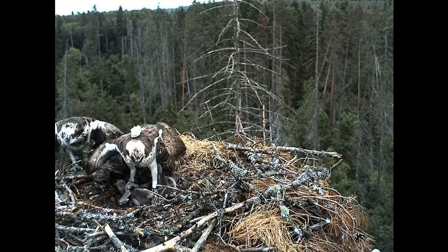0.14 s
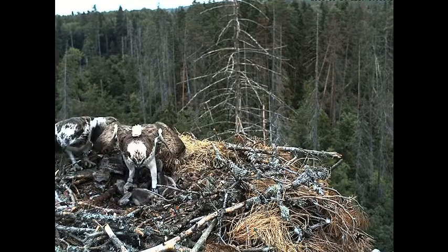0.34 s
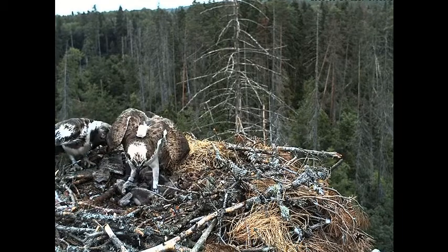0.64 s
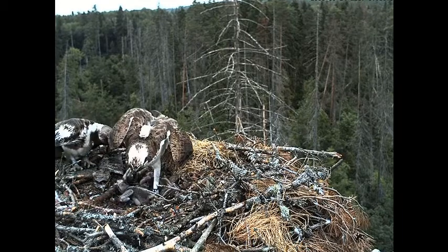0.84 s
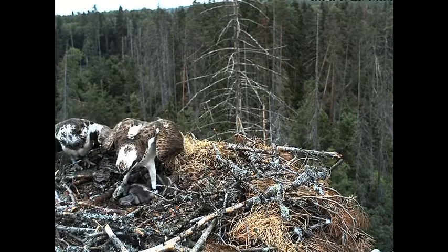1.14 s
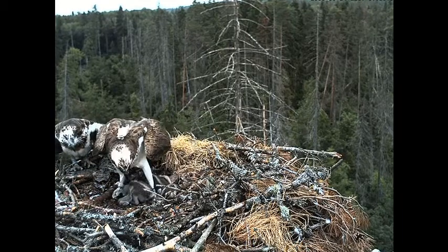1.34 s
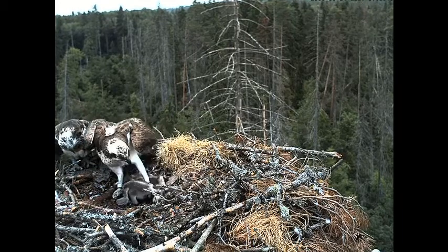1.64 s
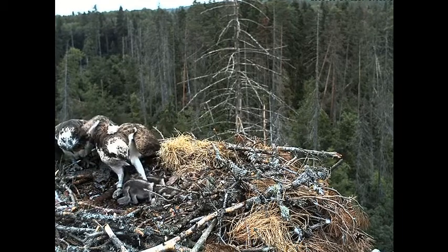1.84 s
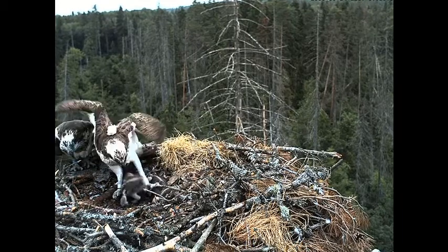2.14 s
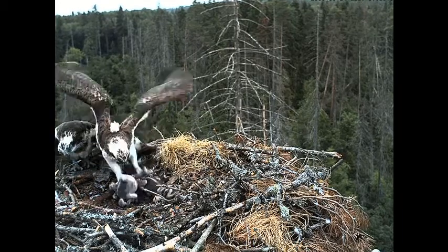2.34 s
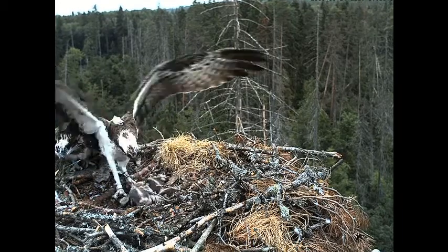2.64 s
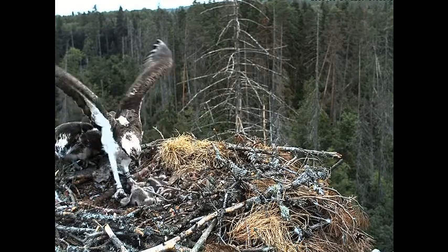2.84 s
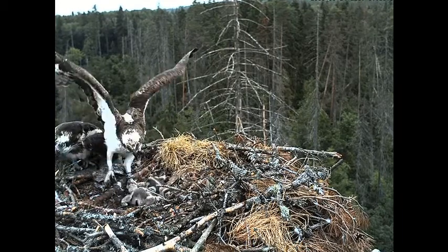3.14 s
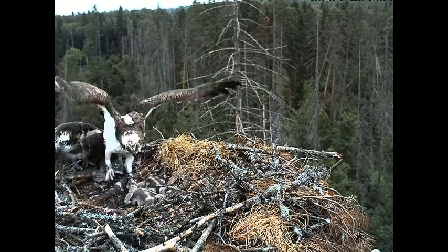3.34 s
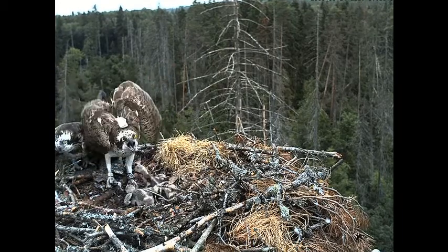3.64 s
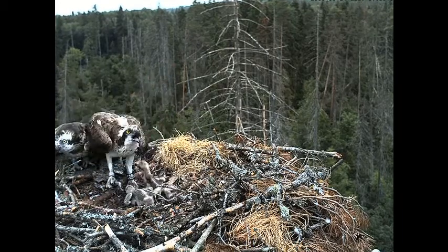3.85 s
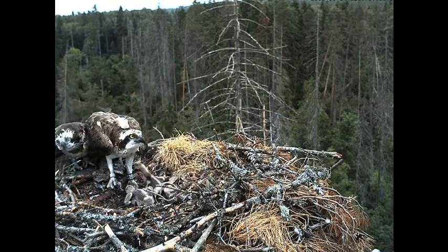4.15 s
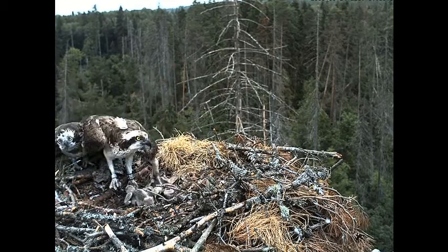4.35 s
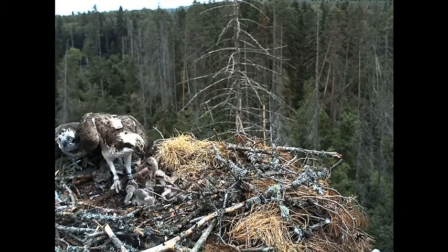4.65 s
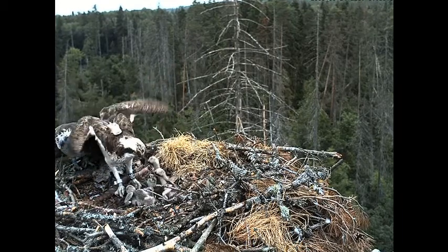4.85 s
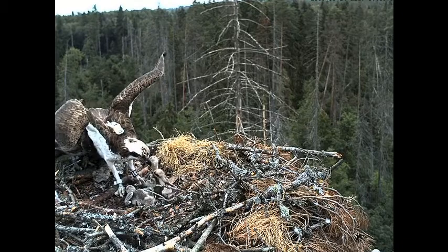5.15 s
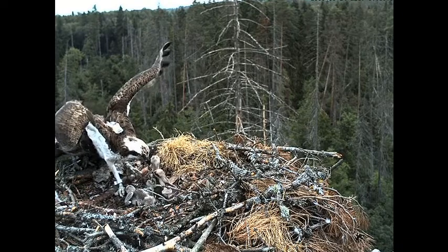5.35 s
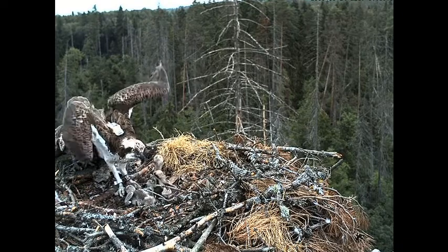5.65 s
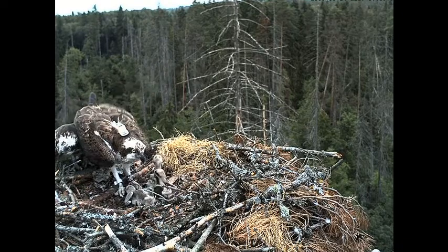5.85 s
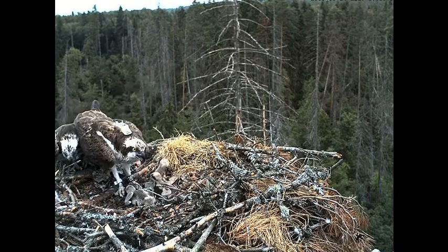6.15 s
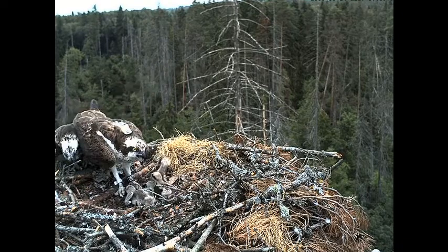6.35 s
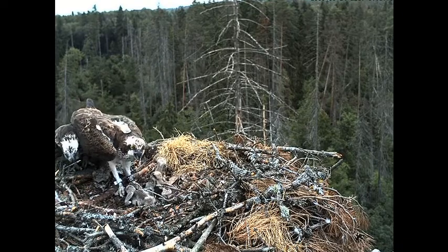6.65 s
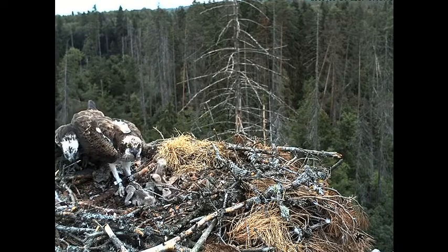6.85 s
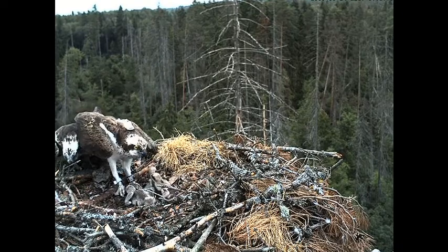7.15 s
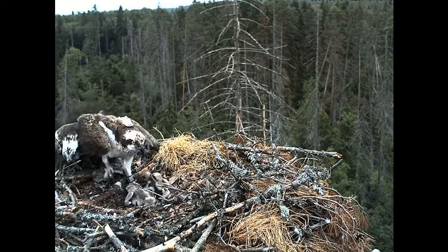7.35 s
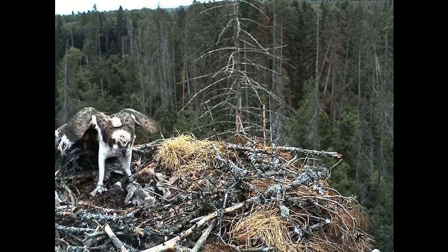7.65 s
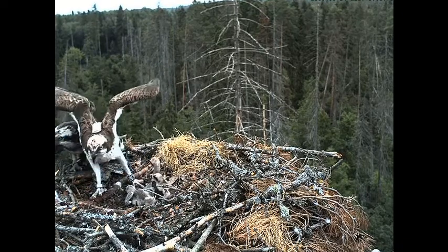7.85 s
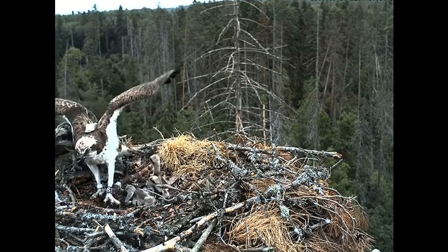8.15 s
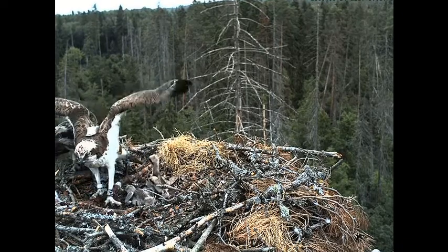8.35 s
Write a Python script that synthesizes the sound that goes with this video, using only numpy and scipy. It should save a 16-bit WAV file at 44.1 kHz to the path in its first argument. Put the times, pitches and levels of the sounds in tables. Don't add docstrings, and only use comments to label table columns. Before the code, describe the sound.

An outdoor osprey nest in a forest, heard close with a band-limited, slightly gritty sound. At once a loud, tiny whistle drops steeply. Until about 2.4 s chicks beg in dense, uneven clusters of thin, very quick gliding peeps, busiest between 1 and 2.4 s. At 2.5 s an adult gives a sharp falling whistle that turns hoarse. Peeps become scattered. A harsher downward slur comes at 3.9 s, a longer, nearly level cry with a falling end at 5.3 s, and a harsh dip that rises again at 6.6 s. Weaker short chirps follow at 7.7, 8.1 and 8.4 s, the last two double-pulsed. Dry twig ticks and brief feathery rasps occur throughout. Soft wind rushes and hisses underneath, strongest near 2 s, swelling again around 5.5 s, quietest near 6 s. Loud calls leave faint tree echoes.

```python
import sys
import numpy as np
from scipy import signal
from scipy.fft import rfft, irfft
from scipy.io import wavfile
from scipy.ndimage import uniform_filter1d, map_coordinates

SR = 44100
rng = np.random.default_rng(int(sys.argv[2]) if len(sys.argv) > 2 else 0)


def digitize_waveform(pressure):
    field = np.atleast_2d(pressure).T
    bounded = np.clip(field, -1, 1)
    quanta = np.round(bounded * 32767).astype(np.int16)
    wavfile.write(sys.argv[1], SR, quanta)


def voltage_ratio(decibels):
    exponent = np.asarray(decibels, float) / 20
    return 10 ** exponent


N = 374850


def unit(x):
    return x / np.sqrt(np.mean(x ** 2) + 1e-20)


def along(points, hz):
    f, db = np.transpose(points)
    return voltage_ratio(np.interp(np.log(hz + 1), np.log(f + 1), db))


def filtered(x, response, rate=SR):
    return irfft(rfft(x) * response(np.fft.rfftfreq(len(x), 1 / rate)), len(x))


def wobble(rate):
    knots = rng.standard_normal(int(N * rate / SR) + 4)
    return map_coordinates(knots, [np.arange(N) * rate / SR])


def smooth(x, seconds):
    return uniform_filter1d(x, max(1, int(seconds * SR)))


def resonance(hz, width):
    return lambda f: 1j * f * width / (hz * hz - f * f + 1j * f * width)


# t/s, low rush level/dB, needle hiss level/dB
WIND_LEVELS = [
    (0.0, -68, -64.5),
    (1.68, -66.5, -61),
    (2.01, -64, -56.5),
    (3.69, -69, -64),
    (4.12, -71, -60),
    (4.36, -69.5, -64),
    (5.28, -67, -62.5),
    (5.49, -65.5, -62),
    (6.08, -72, -68),
    (8.5, -70.5, -65.5),
]
# f/Hz, level/dB per Hz
RUSH_SPECTRUM = [(59, -66), (100, -34), (329, -7), (440, -2.5), (912, -10.5), (994, -13), (1300, -13.5),
                 (1690, -42), (2860, -120)]
# f/Hz, level/dB per Hz
NEEDLE_SPECTRUM = [(530, -42), (900, -16.5), (1240, -10), (1690, -6.5), (1900, -8), (2670, -3), (4000, -14),
                   (5200, -45), (8800, -120)]


def wind():
    s, *levels = np.transpose(WIND_LEVELS)
    t = np.arange(N) / SR
    gust, out = wobble(10), 0
    for db, spectrum, own_db in zip(levels, (RUSH_SPECTRUM, NEEDLE_SPECTRUM), (2.2, 1.5)):
        z = signal.stft(rng.standard_normal(N), nperseg=256)[2]
        patches = uniform_filter1d(rng.standard_normal(z.shape), 4, 0)
        patches = uniform_filter1d(patches, 10, 1)
        noise = signal.istft(z * voltage_ratio(0.81 * unit(patches)), nperseg=256)[1][:N]
        coloured = unit(filtered(noise, lambda f: along(spectrum, f)))
        gain = voltage_ratio(np.interp(t, s, db) + 0.64 * gust + own_db * wobble(25))
        out = out + gain * coloured
    return out


# t/s, peak level/dB, ring f/Hz
TWIG_TICKS = [(0.383, -40, 3150), (0.769, -34, 2210), (0.802, -38, 3030), (0.9, -39, 2730),
              (1.995, -31.5, 1960), (2.599, -27, 2090), (3.118, -41.5, 1970), (3.173, -39, 2084),
              (3.394, -40, 3000), (3.417, -36.5, 1710), (3.686, -38, 3120), (4.154, -39.5, 2398),
              (4.319, -29.5, 2126), (4.644, -28, 1807), (4.754, -29, 2120), (5.627, -38.5, 2770),
              (5.669, -40, 3143), (5.719, -47.5, 3090), (5.802, -40, 3170), (6.96, -41.5, 3067),
              (7.204, -28.5, 2480), (7.345, -46, 2130), (7.601, -37, 2050), (7.896, -37, 2190),
              (8.2, -40, 3040)]


def twigs():
    out, t = np.zeros(N), np.arange(SR // 20) / SR
    for s, db, hz in TWIG_TICKS:
        crack = voltage_ratio(-60 * t / 0.012) * rng.standard_normal(len(t))
        ring = 1.6 * voltage_ratio(-60 * t / 0.013) * np.sin(2 * np.pi * hz * t)
        out[round(s * SR):][:len(t)] += voltage_ratio(db - 5.0) * (crack + ring)
    body = signal.butter(2, [700, 4200], "band", fs=SR, output="sos")
    return signal.sosfilt(body, out)


# t/s, length/s, centre f/Hz, width/Hz, level/dB
RASP_BURSTS = [(0.016, .016, 2500, 2000, -43.5), (.17, .055, 3100, 910, -54), (1.6, .04, 1800, 1220, -57),
               (1.77, .055, 3300, 1298, -50), (1.835, .06, 1700, 1213, -46.5),
               (2.08, 0.065, 2500, 2010, -50.5), (2.3, 0.038, 3600, 880, -53),
               (3.857, .03, 2500, 2500, -50.5), (6.585, .035, 2500, 2500, -48),
               (4.7, 0.091, 1800, 1340, -54.5), (4.82, 0.044, 2300, 1479, -58),
               (7.21, 0.024, 1800, 1500, -59), (7.28, .05, 1900, 1200, -61),
               (7.35, 0.058, 2100, 700, -61.5), (7.61, .08, 1600, 1018, -68.5)]


def rasps():
    out = np.zeros(N)
    for s, length, hz, width, db in RASP_BURSTS:
        n = round(length * SR)
        grain_db = 4.5 * unit(smooth(rng.standard_normal(8192), 0.002))
        grain = rng.standard_normal(8192) * voltage_ratio(grain_db)
        band = resonance(hz, width)
        noise = unit(filtered(grain, lambda f: band(f) ** 2))[:n]
        out[round(s * SR):][:n] += voltage_ratio(db) * noise * signal.windows.tukey(n, 0.4)
    return out


# t/s, length/s, start f/Hz, middle f/Hz, end f/Hz, level/dB
BEGGING_GLIDES = [(0.026, 0.006, 2550.0, 2570.0, 2230.0, -44.5), (0.083, 0.008, 2200.0, 2165, 1950, -45),
                  (0.175, 0.015, 2960, 3110, 3130, -55.5), (0.201, 0.01, 3360, 3100, 3680, -48.5),
                  (0.276, 0.01, 3380, 2960, 2700.0, -39.5), (0.285, 0.007, 2090.0, 1700.0, 1660, -45.5),
                  (0.435, 0.013, 2010, 2670, 3220, -43), (0.446, 0.014, 3210, 3007, 2980, -43.5),
                  (0.491, 0.012, 3070, 3420, 3600, -36), (0.498, 0.013, 3670, 3130, 3030, -27.5),
                  (0.546, 0.011, 2624, 2150, 2090, -44), (0.684, 0.006, 2090, 2270.0, 2510, -47.5),
                  (0.692, 0.014, 3000, 3230.0, 3410.0, -46.5), (0.731, 0.006, 3790, 3580.0, 3270.0, -50.5),
                  (0.777, 0.005, 1840, 2110, 2250, -49), (0.807, 0.005, 1690.0, 1710, 1730, -48),
                  (0.941, 0.013, 1940, 2355, 2484, -42), (0.957, 0.013, 2420.0, 2465, 2516, -48.5),
                  (0.965, 0.013, 2600.0, 2855, 3520, -45.5), (0.974, 0.014, 3420, 3420, 2940, -45.5),
                  (0.993, 0.016, 3130, 3060, 2900, -34.5), (1.047, 0.022, 3680, 2660, 1640, -38.0),
                  (1.209, 0.011, 3430, 2890.0, 2210, -33), (1.221, 0.027, 3270, 3010.0, 1670, -44.0),
                  (1.249, 0.005, 3620, 3590.0, 3650, -50), (1.255, 0.008, 3250.0, 3460.0, 3470, -42),
                  (1.268, 0.008, 4090.0, 3570.0, 3090, -39.0), (1.343, 0.009, 3060.0, 2870.0, 2520, -36),
                  (1.351, 0.006, 2120, 1836, 1464, -37.5), (1.366, 0.013, 2690, 2910, 3170, -48),
                  (1.38, 0.013, 3150, 3320, 3400, -59), (1.394, 0.017, 3490, 3090, 2290.0, -41),
                  (1.618, 0.01, 2116, 1980, 1994, -60), (1.636, 0.014, 3380.0, 2840, 2100.0, -29.5),
                  (1.647, 0.014, 2190, 1780.0, 1326, -37.5), (1.77, 0.005, 3150.0, 3517, 3700, -43),
                  (1.791, 0.017, 2980.0, 3290.0, 3050.0, -44), (1.812, 0.009, 3340.0, 3270.0, 3380, -39.5),
                  (1.818, 0.005, 3937, 3920.0, 3700.0, -47.5),
                  (1.831, 0.006, 3940.0, 3910.0, 3640.0, -29.5),
                  (1.837, 0.012, 3210.0, 3240.0, 3232, -38.5), (1.853, 0.005, 3507, 3270.0, 3346, -44),
                  (1.861, 0.015, 3240, 3477, 3367, -37.5), (1.877, 0.015, 3260, 3310, 3190, -32.5),
                  (1.892, 0.006, 2860.0, 2760.0, 2760, -29), (1.899, 0.011, 2206, 1598, 1410.0, -31),
                  (1.996, 0.016, 1790, 2260.0, 2945, -41.5), (2.014, 0.005, 3218, 3520.0, 3879, -39),
                  (2.017, 0.014, 2865, 3333, 3140.0, -47), (2.07, 0.006, 3423, 3350, 3170, -35),
                  (2.077, 0.011, 3025, 3190, 2920.0, -54), (2.123, 0.016, 3730, 3096, 2643, -34.5),
                  (2.138, 0.011, 2130.0, 1593, 1372, -31), (2.15, 0.05, 2395, 2583, 3000, -58),
                  (2.252, 0.008, 1920.0, 1840.0, 2104, -47), (2.258, 0.005, 1772, 1960.0, 2076, -45.5),
                  (2.262, 0.008, 3210.0, 3600.0, 4070, -48.5), (2.32, 0.007, 3540, 3407, 3714, -56.5),
                  (2.332, 0.014, 3870, 3760.0, 3853, -51.5), (2.344, 0.015, 4036, 3750.0, 2942, -28),
                  (2.377, 0.015, 3177, 2603, 1950.0, -32), (2.405, 0.009, 3620.0, 3080, 2770, -34.5),
                  (2.413, 0.016, 2433, 1807, 1117, -34)]
# t/s, length/s, start f/Hz, middle f/Hz, end f/Hz, level/dB
LATER_PEEPS = [(2.617, 0.01, 1643, 1834, 2087, -52), (2.69, 0.021, 2366, 2815, 2830, -42),
               (2.709, 0.022, 2873, 2840.0, 2611, -42), (2.731, 0.009, 2160.0, 1971, 1641, -41.5),
               (2.745, 0.005, 2365, 2274, 2334, -39), (2.771, 0.015, 3430.0, 3109, 2715, -35),
               (2.795, 0.009, 2142, 1885, 1598, -51), (3.116, 0.007, 2272, 2078, 2031, -43),
               (3.139, 0.01, 2281, 1905, 1376, -46.5), (3.15, 0.005, 2152, 2029, 1979, -60),
               (3.178, 0.05, 2474, 2500, 2541, -58.5), (3.413, 0.012, 1574, 1704, 1606, -54),
               (3.622, 0.012, 1240.0, 1618, 2176, -50.5), (3.662, 0.014, 3450.0, 3350, 3113, -34.5),
               (3.678, 0.014, 3112, 3113, 3138, -33.5), (3.744, 0.011, 2920.0, 2523, 2426, -48),
               (3.754, 0.007, 1991, 1842, 2234, -45.5), (4.178, 0.021, 2172, 2757, 2924, -35),
               (4.199, 0.009, 2918, 2714, 2838, -40.5), (4.208, 0.012, 2841, 2897, 3176, -42.5),
               (4.223, 0.014, 2880, 3037, 3053, -45), (4.231, 0.015, 3043, 3170, 3508, -50),
               (4.251, 0.013, 2767, 3080, 3100, -45.5), (4.261, 0.013, 3186, 2823, 2653, -31),
               (4.306, 0.012, 2660.0, 2394, 2058, -35), (4.318, 0.012, 2712, 2089, 2162, -44),
               (4.597, 0.008, 3091, 2536, 2440.0, -36.5), (4.632, 0.01, 2742, 2164, 1872, -40.5),
               (4.739, 0.006, 1673, 1687, 1650.0, -43), (4.751, 0.007, 2093, 2156, 2016, -43.5),
               (4.947, 0.022, 2140, 1960.0, 1811, -47), (4.988, 0.013, 1423, 1520.0, 1817, -47.5),
               (5, 0.013, 1793, 1933, 1877, -36), (5.014, 0.013, 1892, 1786, 1432, -38.5),
               (5.023, 0.014, 1546, 1444, 1530.0, -49), (5.457, 0.014, 2500, 2304, 2000, -35.5),
               (7.344, 0.008, 2290.0, 2193, 2130.0, -47), (7.388, 0.005, 2000.0, 1982, 2116, -51.5),
               (7.734, 0.01, 2233, 1998, 1800, -54.5), (7.9, 0.006, 2150, 2174, 2210.0, -39.5),
               (7.945, 0.009, 2103, 2145, 2130.0, -51), (8.098, 0.009, 2200, 1990, 1803, -44.5),
               (8.442, 0.009, 2200, 2000, 1757, -46.5)]


def chicks():
    t = np.arange(N) / SR
    s, length, start_hz, mid_hz, end_hz, db = np.transpose(BEGGING_GLIDES + LATER_PEEPS)
    times = np.sort(np.ravel([s, s + length / 2, s + length - 1e-4]))
    pitches = np.ravel([start_hz, mid_hz, end_hz], order="F")
    hz = smooth(np.interp(t, times, pitches), 0.003)
    level = np.zeros(N)
    for start, end, gain in zip(s, s + length, voltage_ratio(db)):
        level[round(start * SR):round(end * SR) + 2] = gain
    level = smooth(smooth(level, 0.004), 0.003) * voltage_ratio(1.5 * wobble(250))
    phase = 2 * np.pi * np.cumsum(hz * (1 + 0.02 * wobble(400))) / SR
    octave = voltage_ratio(-11.5) * np.clip((2400 - hz) / 350, 0, 1)
    return level * (np.sin(phase) + octave * np.sin(2 * phase))


# t/s, f/Hz, level/dB, harshness (overtone level re the tone)/dB
ADULT_WHISTLES = [
    [(0.031, 3717, -46.5, -32), (0.034, 3730, -30.5, -40.5), (0.038, 2976, -10, -38.5),
     (0.045, 3110, -11, -39), (0.056, 2788, -24, -36), (0.064, 2780, -47, -38)],
    [(2.515, 3890, -46, -33.5), (2.519, 3865, -32, -34), (2.522, 3778, -14, -36), (2.534, 3110, -12, -32.5),
     (2.542, 2699, -21, -30), (2.552, 2317, -17.0, -31.5), (2.567, 2000, -26, -14.5),
     (2.587, 1733, -30.5, -15), (2.602, 1590, -48, -1.5)],
    [(3.882, 3838, -45.5, -28.5), (3.886, 3870, -26.5, -25.5), (3.893, 4000, -22, -19),
     (3.896, 3871, -14.5, -14.5), (3.924, 3461, -11.5, -20.5), (3.949, 2624, -11.5, -23.5),
     (3.957, 2360, -22.5, -27), (3.963, 2363, -15.5, -31.5), (3.973, 2180, -20.5, -25.5),
     (3.99, 2306, -46.5, -24.5)],
    [(5.321, 3360, -53, -40), (5.324, 3404, -25, -40), (5.328, 3250, -19.5, -38), (5.331, 3359, -17.5, -39),
     (5.362, 3430, -15, -42.5), (5.425, 3333, -13.5, -40.5), (5.447, 3062, -10, -39),
     (5.463, 2983, -27, -45), (5.47, 2927, -41.5, -40.5)],
    [(6.612, 3786, -42, -15.5), (6.617, 3773, -29, -25.5), (6.624, 3937, -16.5, -15),
     (6.635, 3684, -15.5, -11), (6.663, 3295, -12.5, -26.5), (6.685, 2571, -12, -31.5),
     (6.69, 2423, -18.5, -36), (6.698, 2493, -16.5, -33), (6.719, 3194, -15.5, -41.5),
     (6.725, 3375, -55.5, -38)],
    [(7.687, 2948, -55.5, -40), (7.694, 2935, -21.5, -43), (7.698, 3085, -19, -37),
     (7.713, 2996, -20.5, -31), (7.737, 2730, -44.8, -39)],
    [(8.067, 3174, -58.5, -33), (8.071, 3143, -21.5, -36), (8.087, 2977, -31.5, -35),
     (8.097, 2748, -20.5, -31.5), (8.101, 2790, -34, -37), (8.105, 2660, -48.7, -32.5)],
    [(8.408, 2948, -63.5, -31), (8.415, 3022, -21.5, -34), (8.423, 2977, -36.5, -36),
     (8.437, 2767, -19.5, -28.5), (8.446, 2755, -41.5, -41)],
]


def adult():
    out = np.zeros(N)
    flutter, waver = voltage_ratio(0.6 * wobble(200)), 1 + 0.0048 * wobble(200)
    for rows in ADULT_WHISTLES:
        s, hz, db, harsh_db = np.transpose(rows)
        span = slice(round(s[0] * SR), round(s[-1] * SR))
        t = np.arange(N)[span] / SR
        pitch = smooth(np.interp(t, s, hz), 0.006) * waver[span]
        phase = 2 * np.pi * np.cumsum(pitch) / SR
        breath = voltage_ratio(-9) * rng.standard_normal(len(t))
        overtones = np.sin(2 * phase) + voltage_ratio(-3.0) * np.sin(3 * phase) + breath
        tone = np.sin(phase) + voltage_ratio(np.interp(t, s, harsh_db)) * overtones
        pressure = np.sqrt(2) * np.interp(t, s, voltage_ratio(db))
        edge = np.clip(np.minimum(t - s[0], s[-1] - t) / 0.0005, 0, 1)
        out[span] = pressure * edge * flutter[span] * tone
    return out


# delay t/s, level/dB
CLOSE_ECHOES = [(.0011, -18.5), (.0034, -20.5), (.0071, -21.5)]


def forest(x):
    t = np.arange(int(1.5 * SR)) / SR
    near = voltage_ratio(-34.5 - 60 * t / 0.081)
    arrival = np.clip((t - 0.11) / 0.05, 0, 1)
    far = voltage_ratio(-70.5 - 60 * t / 1.2) * arrival * voltage_ratio(9 * wobble(30)[:len(t)])
    tail = (voltage_ratio(-28.5) * near + far) * rng.standard_normal(len(t))
    direct = x + sum(voltage_ratio(db) * np.roll(x, round(s * SR)) for s, db in CLOSE_ECHOES)
    return voltage_ratio(0.71) * direct + signal.fftconvolve(x, tail)[:N]


def scene():
    nest = adult() + chicks() + twigs() + rasps()
    return (forest(nest) + wind())[None]


# f/Hz, level/dB
PLAYBACK_FILTER = [(60, -31), (200, -10), (320, -1), (560, 3.5), (1000, -2), (3300, -0.5), (4000, -1.5),
                   (4600, -21.5), (4900, -31), (5300, -65), (12000, -79)]


def camera(x):
    camera_hz, step = 8000, 6
    count = round(N * camera_hz / SR)
    kept = signal.resample(x, count * step)[::step] / 0.58
    companded = np.log1p(255 * np.minimum(abs(kept), 1)) / np.log(256)
    steps = np.round(127 * companded) / 127
    comb = np.zeros(count * step)
    comb[::step] = step * 0.64 * np.sign(kept) * (256 ** steps - 1) / 255
    rebuilt = filtered(comb, lambda f: along(PLAYBACK_FILTER, f), camera_hz * step)
    x = signal.resample(rebuilt, N)
    x = x - 0.54 * x ** 3
    x = filtered(x, lambda f: along([(10200, -1), (11000, -23.5), (15000, -30)], f))
    return x + voltage_ratio(-95) * rng.standard_normal(N)


def top_cut(x):
    return signal.sosfilt(signal.butter(12, 15050, fs=SR, output="sos"), x)


def record(dry):
    mix = camera(dry[0])[None]
    return top_cut(mix)


dry = scene()
out = record(dry)
digitize_waveform(out)
```